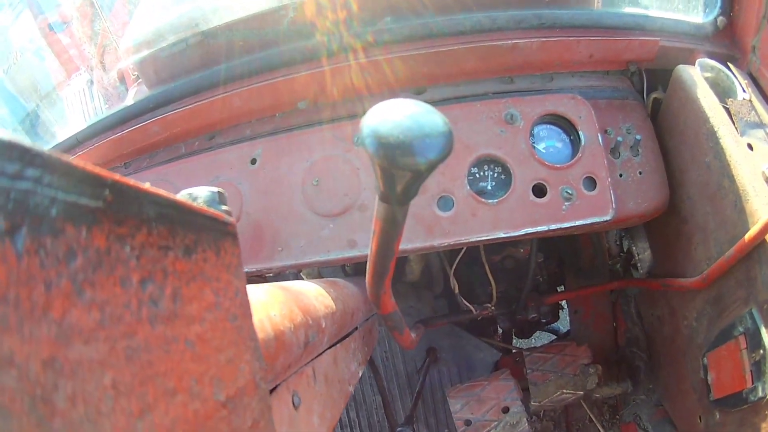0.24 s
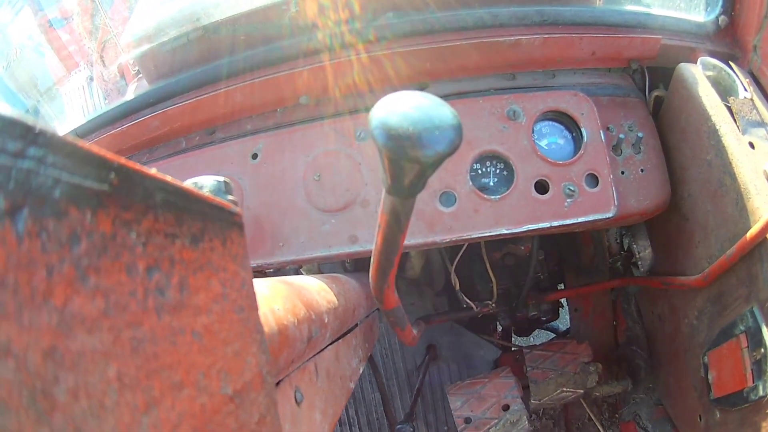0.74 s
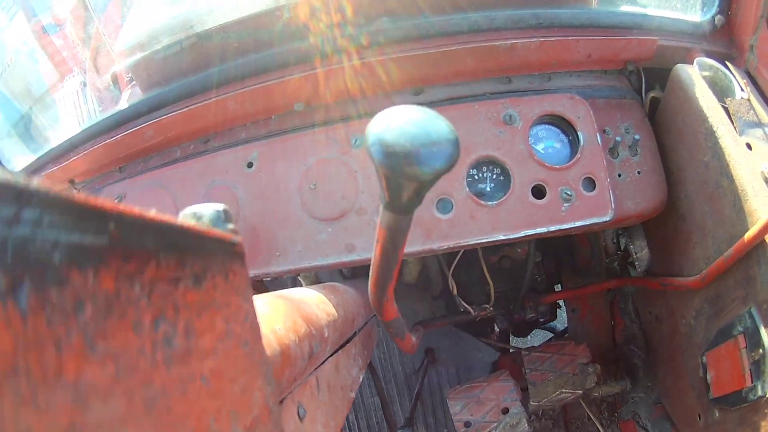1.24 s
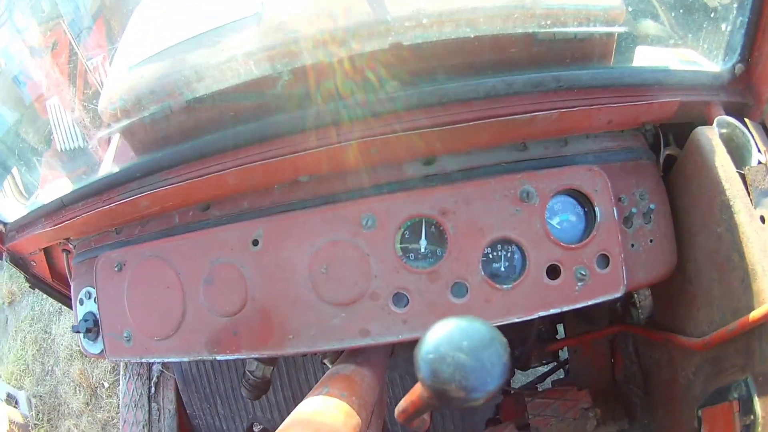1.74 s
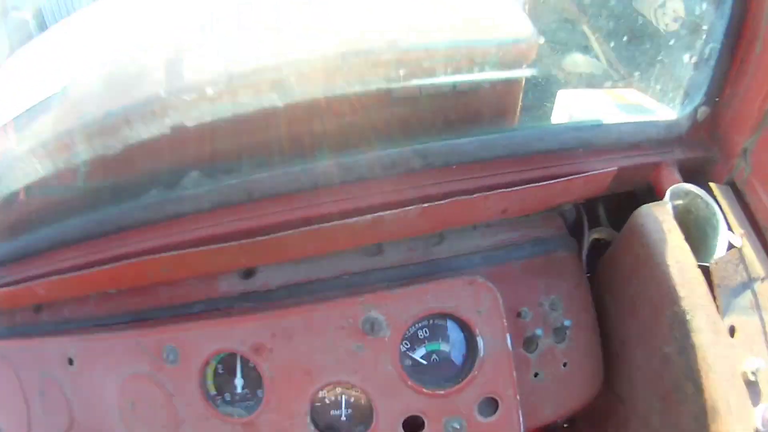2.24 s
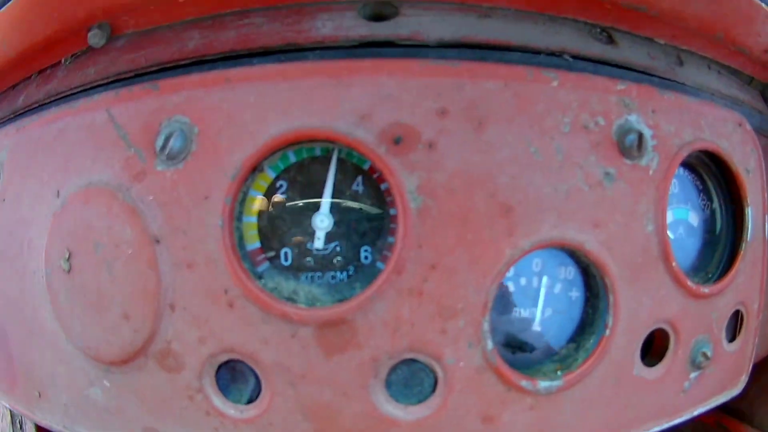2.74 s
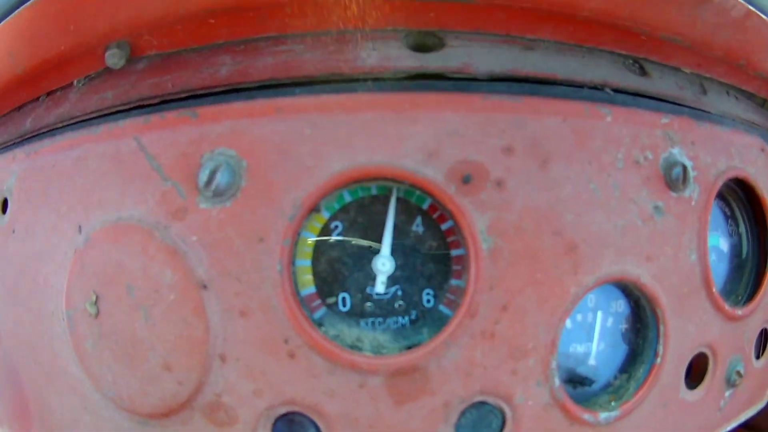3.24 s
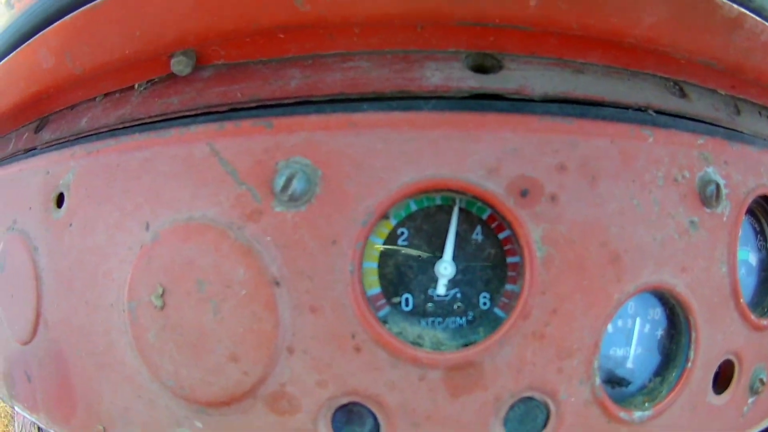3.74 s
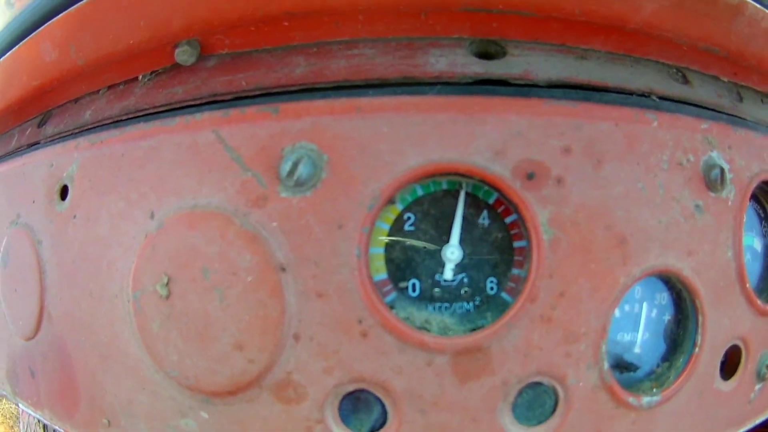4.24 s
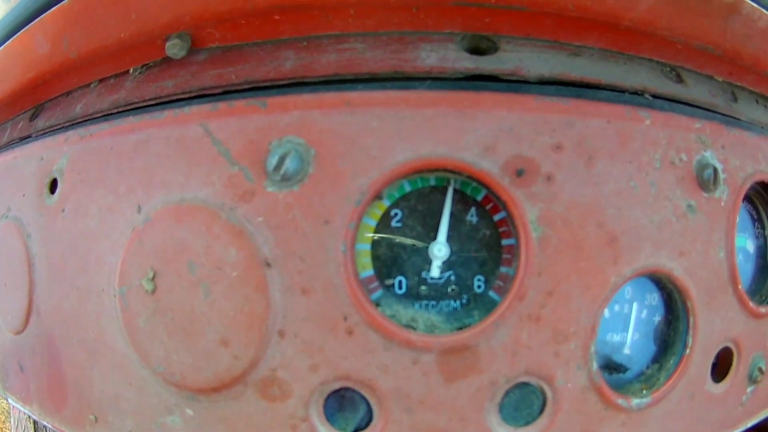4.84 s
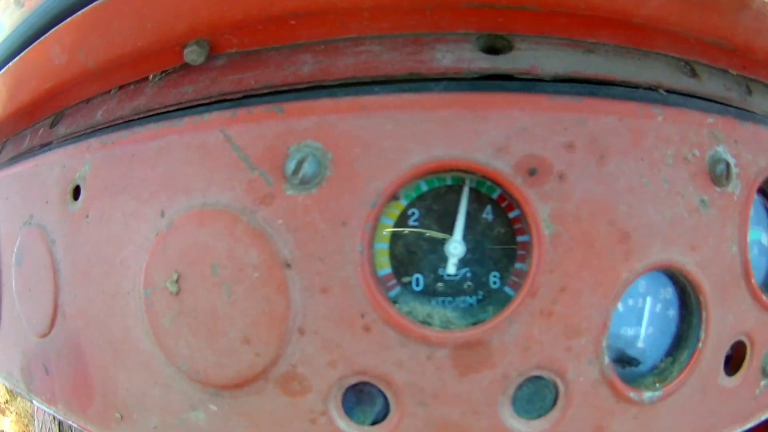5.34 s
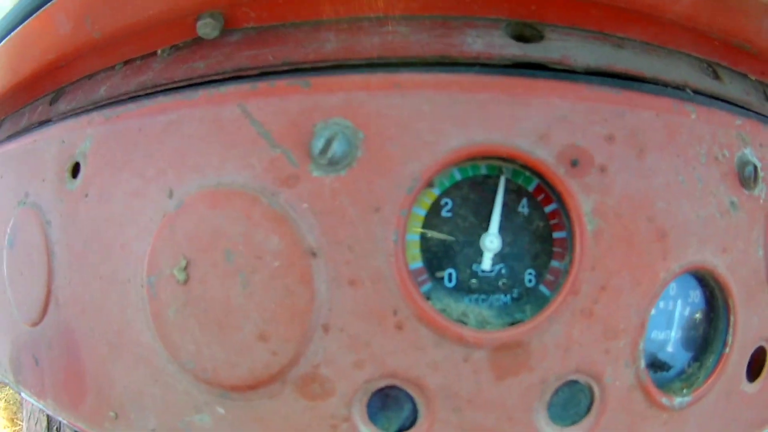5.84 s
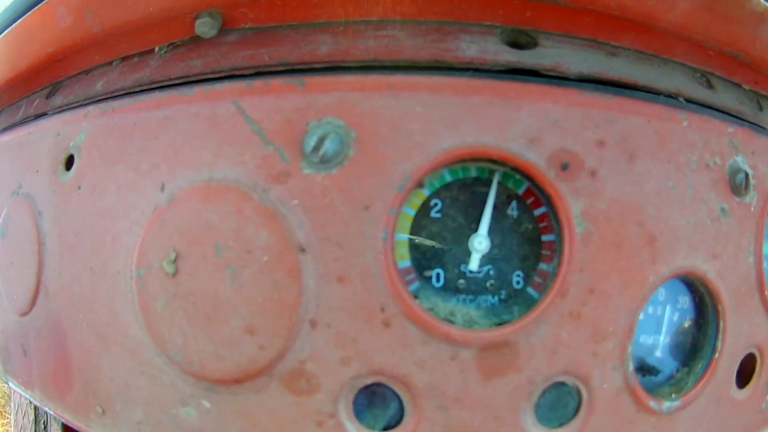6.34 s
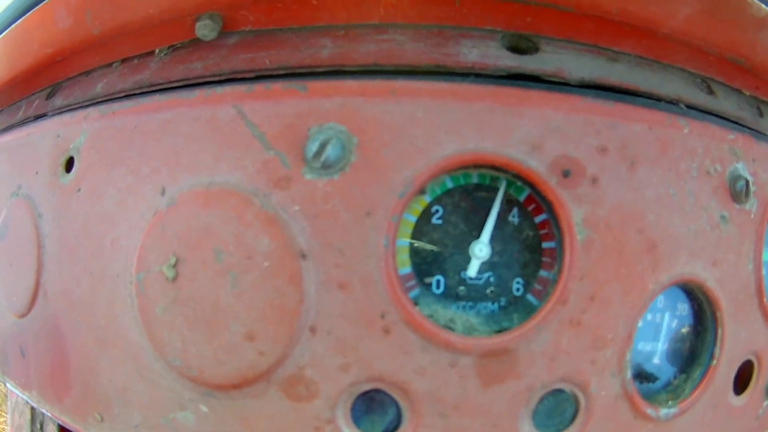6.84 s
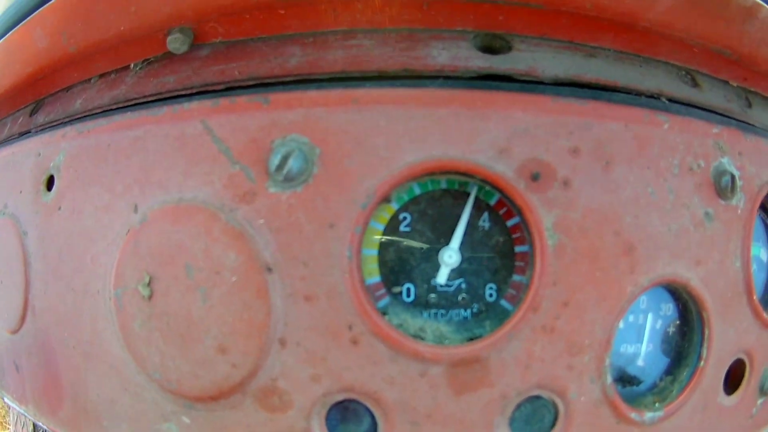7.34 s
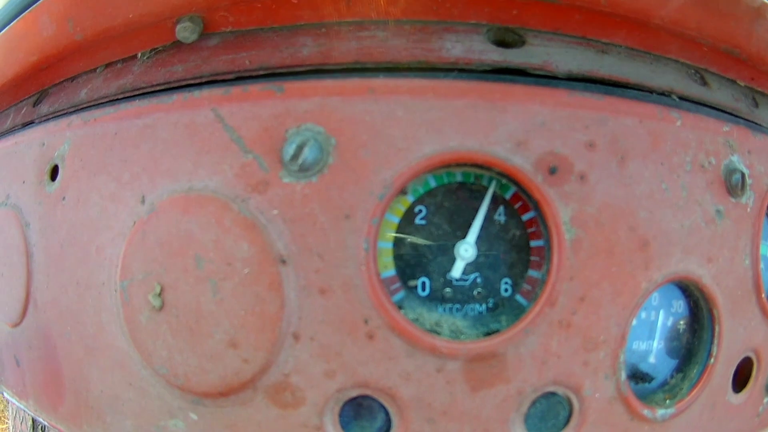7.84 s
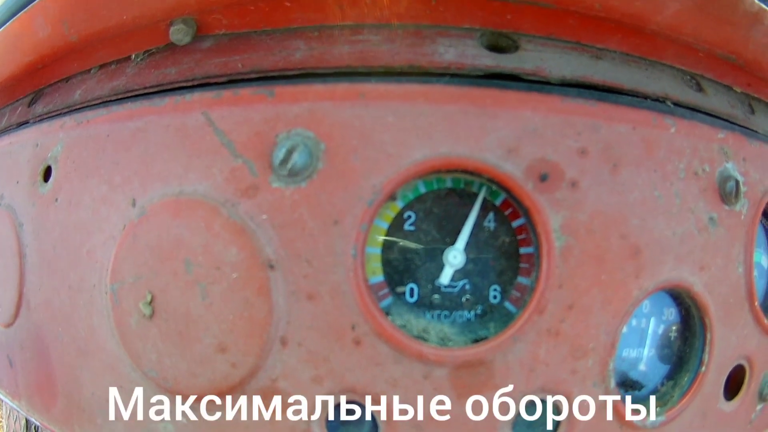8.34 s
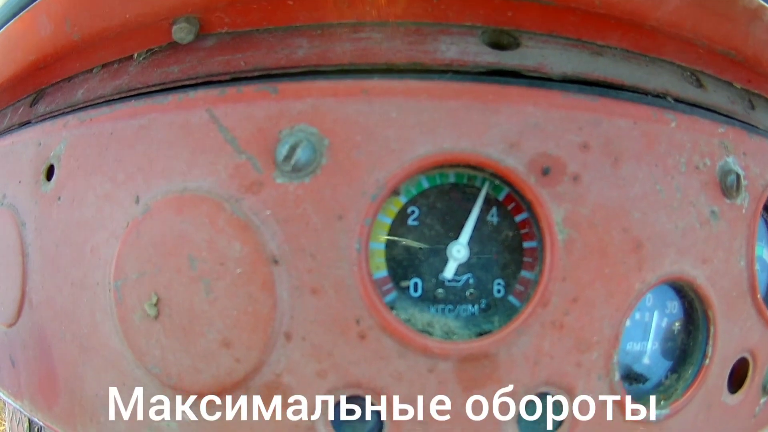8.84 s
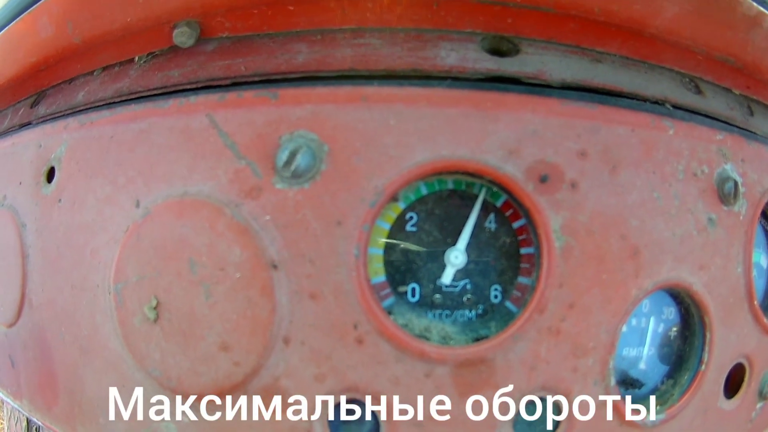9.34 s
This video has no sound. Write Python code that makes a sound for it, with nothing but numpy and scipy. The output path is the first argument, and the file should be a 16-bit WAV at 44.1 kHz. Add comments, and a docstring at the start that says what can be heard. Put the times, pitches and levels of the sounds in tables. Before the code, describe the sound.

From 0 to 5.5 s an old tractor diesel idles steadily inside its steel cab, lumpy and uneven, with one blunt hard knock per cycle, about eight a second, ringing the sheet metal. Under it the cab air booms low; over it sit combustion clatter and valve chatter. A thin wavering panel tone sings near the seat until, between 1.8 and 2.5 s, the microphone moves to the dashboard and the clatter comes slightly closer. At 5.6 s the throttle opens with a stumbling thump; speed climbs quickly to 7.6 s, harsher and brighter, while a loose metal part rattles from 5.8 to 6.9 s. The separate knocks blend into a dense roaring drone, held until 8.5 s, then rising again to the end at 9.6 s, with a swelling low rumble around 9 s. Short bright overload crackles appear from 6.7 s, more often after 8.5 s. It ends still revving.

```python
"""Inside the steel cab of an old diesel tractor. The engine idles lumpily, with one hard knock per cycle,
while the microphone moves from the seat up to the dashboard; then it is opened up in two steps to full speed.
Firings make the cab air boom, clicks of combustion and valve gear ring in its panels,
and struck modes make a loose part rattle as the speed passes through.
Filtered noise adds a low rumble at the microphone and short bright overload ticks."""
import sys
import numpy as np
from scipy import signal
from scipy.fft import rfft, irfft, next_fast_len
from scipy.io import wavfile
from scipy.ndimage import uniform_filter1d, minimum_filter1d

SR = 44100
rng = np.random.default_rng(int(sys.argv[2]) if len(sys.argv) > 2 else 0)


def dump(signal):
    """Clip the signal to [-1, 1] and save it as 16-bit WAV at the path in sys.argv[1]."""
    limited = np.clip(np.atleast_2d(signal).T, -1, 1)
    pcm = np.round(limited * 32767).astype(np.int16)
    wavfile.write(sys.argv[1], SR, pcm)


N = 422478
T = np.arange(N) / SR
SIZE = next_fast_len(N + SR // 2, real=True)
HZ = np.maximum(np.arange(SIZE // 2 + 1) * SR / SIZE, 1)


def from_db(db):
    """Decibels to gain."""
    return 10 ** (np.asarray(db) / 20)


def ramp(start, end):
    """A change from 0 to 1 between two moments in seconds."""
    return np.clip((T - start) / (end - start), 0, 1)


def cut(x, hz, kind, order=2):
    """Butterworth filter."""
    return signal.sosfilt(signal.butter(order, hz, kind, fs=SR, output="sos"), x)


def drift(rate):
    """Chance values of spread about 1, drawn at this rate per second and joined by straight lines."""
    points = rng.standard_normal(int(T[-1] * rate) + 2)
    return np.interp(T * rate, np.arange(len(points)), points)


def local_rms(x, floor):
    """Rms over 0.36 s, a few engine cycles."""
    return np.sqrt(uniform_filter1d(x * x, size=15900) + floor)


def steady(x):
    """Scale to rms 1 over a few engine cycles."""
    return x / local_rms(x, 1e-12)


def causal(level_db):
    """Minimum-phase response with these levels: a body rings only after it is struck."""
    cepstrum = irfft(np.log(from_db(level_db)))
    half = len(cepstrum) // 2
    cepstrum[1:half] *= 2
    cepstrum[half + 1:] = 0
    return np.exp(rfft(cepstrum))


def peaks(modes):
    """Level in dB that a set of resonances adds at each frequency."""
    return sum(peak_db / (1 + (2 * (HZ - centre) / width) ** 2) for centre, width, peak_db in modes)


def ring(clicks, modes, uneven_db):
    """Each click sets all modes ringing as decaying sines, with new strengths every time."""
    out, at = np.zeros(N), np.flatnonzero(clicks)
    for hz, level_db, t60 in modes:
        force = np.full(N, 1e-18)
        force[at] = clicks[at] * from_db(level_db + uneven_db * rng.standard_normal(len(at)))
        radius = from_db(-60 / (t60 * SR))
        angle = 2 * np.pi * hz / SR
        poles = [1, -2 * radius * np.cos(angle), radius * radius]
        out += signal.lfilter([0, np.sin(angle)], poles, force)
    return out


def scatter(x, echo, spread_s):
    """Quick reflections between bare walls, as four allpass echoes, smear each click without colouring it."""
    lags_s = spread_s * np.geomspace(1 / 4, 1, 4) * rng.uniform(.85, 1.16, 4)
    for lag in (lags_s * SR).astype(int) + 1:
        taps = np.r_[-echo, np.zeros(lag - 1), 1]
        x = signal.lfilter(taps, taps[::-1], x)
    return x


def contacts(turn, position, gain, jitter_s, uneven_db):
    """Clicks that come back at the same crank positions in every cycle, never quite alike."""
    due = np.arange(-1, int(turn[-1]) + 1)[:, None] + position
    when = np.interp(due, turn, T, left=-1, right=-1) + jitter_s * rng.standard_normal(due.shape)
    force = gain * from_db(uneven_db * rng.standard_normal(due.shape))
    inside = (when > 0) & (when < T[-1])
    return np.bincount((when[inside] * SR).astype(int), force[inside], N)


def clicks_at(rows):
    """Clicks at listed moments; each row: start in seconds, level in dB."""
    start_s, level_db = np.transpose(rows)
    return np.bincount((start_s * SR).astype(int), from_db(level_db), N)


BUZZ_RISE_S = .0012


def buzz(clicks, band_hz, decay_s):
    """Each click sets off a dense, dying chatter within one band, its swing held between two stops."""
    fall, rise = np.exp(-1 / (SR * np.array([decay_s, BUZZ_RISE_S])))
    envelope = signal.lfilter([1 - rise], np.poly([fall, rise]), clicks + 1e-18)
    swing = cut(rng.standard_normal(N), band_hz, "bandpass", order=3)
    chatter = cut(np.sign(swing), np.array(band_hz) * [.85, 1.15], "bandpass", order=3)
    return envelope * chatter / chatter.std()


# Engine speed. Each row: time in seconds, four-stroke cycles per second.
ENGINE_SPEED = [(0.0, 8.279), (0.57, 8.279), (1.27, 8.342), (1.97, 8.295), (5.48, 8.335), (5.68, 8.647),
                (5.9, 8.628), (6.35, 10.886), (7.05, 13.638), (7.45, 14.781), (7.65, 15.14), (8.53, 15.108),
                (9.25, 17.193), (9.58, 17.989)]
FIRST_KNOCK = .76           # cycles before crank angle zero
FULL_PULL = 4.36            # acceleration that brings nearly full fuel, cycles per s, per s
FUEL_SMOOTHING_S = 0.19


def engine_state():
    """Crank angle in cycles, speed, and how hard the engine pulls (0-1), which follows from its acceleration."""
    speed = np.interp(T, *np.transpose(ENGINE_SPEED))
    gathering = uniform_filter1d(np.gradient(speed) * SR, size=int(FUEL_SMOOTHING_S * SR) + 1)
    pull = np.tanh(np.maximum(gathering, 0) / FULL_PULL)
    return np.cumsum(speed) / SR - FIRST_KNOCK, speed, pull


# Loudness laws of five layers. Each row: level in dB idling by the seat, dB more at the dashboard,
# dB per doubling of speed, dB more at full pull.
BOOM_LOUDNESS = (-18.5, -0.04, 0.65, 1.64)
CLATTER_LOUDNESS = (-29, 3, 8.5, 4.5)
TREBLE_LOUDNESS = (-55, -1, 10, 8.5)
KNOCK_LOUDNESS = (-24, -1.5, -2, 8.5)
RUMBLE_LOUDNESS = (-47, 1, 7.5, 7.5)
IDLE_CYCLES_PER_S = 8.3
LOUDEST_AT = 16.2           # cycles per s, above which speed adds no more loudness


def loudness(law, near, speed, pull):
    """Level in dB of a layer, from the microphone's nearness to the dashboard, speed and fuel."""
    idle_db, near_db, octave_db, pull_db = law
    octaves = np.log2(np.minimum(speed, LOUDEST_AT) / IDLE_CYCLES_PER_S)
    return idle_db + near_db * near + octave_db * octaves + pull_db * pull


def low_rumble():
    """Low wind-like rumble at the microphone: noise between 13 and 54 Hz."""
    return steady(cut(cut(rng.standard_normal(N), 54, "low", order=3), 13, "high"))


PANEL_HZ, PANEL_DB = 582, -39.5     # pitch, and rms level about which it wavers


def singing_panel(near):
    """A panel by the seat sings a wavering sine at idle, lost as the microphone leaves the seat."""
    phase = 2 * np.pi * PANEL_HZ * T + 0.45 * drift(11)
    return np.sqrt(2) * np.sin(phase) * from_db(PANEL_DB + 2 * drift(13)) * (1 - near)


# Overload ticks, as of a recorder driven too hard at speed.
# Each row: start in seconds, level in dB before filtering.
OVERLOAD_TICKS = [(6.7165, -28), (6.735, -27), (7.0984, -31), (7.4521, -23), (8.5072, -35), (8.6998, -35),
                  (8.7118, -30), (8.8963, -29), (8.9572, -31), (9.0191, -27), (9.0794, -31), (9.1977, -29),
                  (9.2135, -30)]
TICK_HZ, TICK_DECAY_S = (1500, 5000), .0015


def overload_ticks():
    """Short, bright crackles at listed moments: dying bursts of noise that stick out of the clatter."""
    fall = np.exp(-1 / (TICK_DECAY_S * SR))
    envelope = signal.lfilter([1], [1, -fall], clicks_at(OVERLOAD_TICKS) + 1e-18)
    crackle = cut(envelope * rng.standard_normal(N), TICK_HZ, "bandpass")
    return cut(crackle, 12500, "low", order=8)


# Strikes of a loose metal part. Each row: start in seconds, strike level in dB before it rings.
LOOSE_STRIKES = [(5.7758, -20), (5.811, -18), (5.8297, -13.5), (5.861, -11), (5.8745, -19), (5.891, -15.5),
                 (5.975, -18.5), (6.043, -21), (6.0565, -21.5), (6.229, -20.5), (6.266, -24), (6.2775, -26),
                 (6.326, -19), (6.421, -14), (6.455, -17), (6.475, -14), (6.492, -20), (6.5107, -14),
                 (6.5265, -23), (6.5457, -14.5), (6.564, -13), (6.58, -13), (6.598, -13), (6.613, -17),
                 (6.633, -12.5), (6.6655, -15), (6.684, -19), (6.699, -17), (6.711, -21), (6.717, -14),
                 (6.736, -16), (6.751, -17), (6.782, -15.5), (6.793, -20), (6.832, -19), (6.861, -25)]
# Modes of the loose part. Each row: frequency in Hz, relative level in dB, t60 in seconds.
LOOSE_PART_MODES = [(1960, -11, 0.013), (2310, -6.5, 0.015), (2450, -2, 0.017), (2540, -8.5, .013),
                    (2830, -13.5, .012), (3530, -13, .008), (4050, -16, 0.0079), (4250, -14.5, .009),
                    (8650, -7.5, 0.005), (9000, -8, .004)]
BOUNCE_DECAY_S, BOUNCE_DB = .003, -2.5      # level against the strike


def rattle():
    """Each strike of the loose part is one firm click and a burst of tiny bounces, a few milliseconds long."""
    clicks = np.zeros(N)
    after = np.arange(400) / SR
    for start_s, level_db in LOOSE_STRIKES:
        bounces = rng.standard_normal(len(after)) * np.exp(-after / BOUNCE_DECAY_S)
        burst = (after == 0) + from_db(BOUNCE_DB) * bounces / np.linalg.norm(bounces)
        first = round(start_s * SR)
        clicks[first:first + len(after)] += from_db(level_db) * burst
    ringing = ring(clicks, LOOSE_PART_MODES, uneven_db=0.3)
    return from_db(-2.5) * cut(ringing, 3750, "low", order=3)


# The first gulp of fuel. Each row: start in seconds, relative level in dB.
FUEL_GULPS = [(5.594, -25), (5.622, -21), (5.642, -19)]


def gulp():
    """A broad, stumbling thump of the cab as the first extra fuel burns."""
    return buzz(clicks_at(FUEL_GULPS), (220, 1300), decay_s=0.013)


# Injectors, valve gear and loose sheet metal. Each row: position in the cycle 0-1, centre in Hz, width in Hz,
# decay in seconds, then relative level in dB by the seat, at the dashboard, pulling, running free.
CRANK_BUZZES = [(0.97, 3970, 400, .013, -49, -46, -49, -50.5), (0.86, 3970, 330, .008, -58, -54, -57, -50),
                (.76, 4000, 700, .0025, -53, -42, -54, -49), (.78, 2600, 1200, .003, -49, -41, -37, -37),
                (.17, 6350, 1100, 0.014, -59.5, -59, -56, -57.5),
                (.99, 6000, 1400, .012, -63, -59.5, -55, -57.5),
                (0.43, 2700, 1000, 0.016, -43.5, -44, -41, -41.5),
                (0.97, 1950, 1100, 0.006, -48, -43, -22, -41.5),
                (.76, 1150, 650, 0.0035, -29, -23.5, -19, -24),
                (0.99, 850, 230, 0.007, -28, -26, -23, -26.5), (0.03, 930, 130, .016, -32, -26, -25, -26),
                (.15, 1230, 260, .011, -36.5, -33, -16.5, -22), (.0, 1230, 330, 0.008, -42, -32, -16, -16),
                (.29, 400, 212, .013, -32, -27, -21.5, -20), (.5, 1250, 200, .012, -38, -30, -32, -32),
                (.55, 4900, 2400, .012, -62, -64, -45, -51), (.99, 10300, 2600, .025, -73, -78, -71, -77)]
# Firings thud in the floor and bulkhead. Each row: position in the cycle 0-1, frequency in Hz,
# t60 in seconds, then level in dB before filtering by the seat, at the dashboard, pulling, running free.
FLOOR_THUDS = [(0.99, 275, .06, -23.5, -29, -16, -24), (.18, 235, 0.068, -26, -22.5, -22, -23.5),
               (.41, 165, 0.057, -20.5, -17.5, -22.5, -24), (0.01, 165, 0.044, -29, -33, -11.5, -20.5)]


def fittings(turn, states):
    """Buzzes and thuds come round with the crank; their strength follows the listening place and engine state."""
    out = 0
    for at, hz, width_hz, decay_s, *level_db in CRANK_BUZZES:
        strikes = contacts(turn, np.array([at]), 0.94, jitter_s=0.00055, uneven_db=1)
        strikes = strikes * (from_db(level_db) @ states)
        band_hz = [max(hz - width_hz / 2, 50), hz + width_hz / 2]
        out = out + buzz(strikes, band_hz, decay_s)
    for at, hz, t60, *level_db in FLOOR_THUDS:
        strikes = contacts(turn, np.array([at]), 1, jitter_s=.0005, uneven_db=2.0)
        strikes = strikes * (from_db(level_db) @ states)
        out = out + cut(ring(strikes, [(hz, 0, t60)], uneven_db=1.5), [130, 500], "bandpass")
    return out


# Lesser contacts in each cycle. Each row: position in the cycle 0-1, relative dB idling, running fast.
LESSER_KNOCKS = [(.02, -3, -1.5), (.08, -4.5, -6), (0.249, -3, -17.5), (.50, 1, -7), (0.699, -18, 0),
                 (0.789, 0, -10), (0.879, -2, -4)]
# Swell of the clatter over a cycle. Each row: position in the cycle 0-1, dB idling, under load.
CYCLE_SWELL = [(.0, 1.3, 2.5), (.18, 1.6, 2), (.36, .3, 1.2), (.5, -1, -1), (.66, -1.9, -2.5),
               (.8, -.7, -1.5), (.94, -1.5, -3.5)]
COASTING_SWELL = 0.35               # share of the swell left when running fast without pulling
GRIT_DB, GRIT_PER_S = 1.8, 450      # roughness of the rush of gas under load, and the rate of its grain


def clatter(turn, load, pull):
    """Combustion, many small valve and gear contacts, and a rush of gas that comes in gusts under load."""
    position, idle_db, load_db = np.transpose(CYCLE_SWELL)
    idle_swell_db = np.interp(turn, position, idle_db, period=1)
    load_swell_db = np.interp(turn, position, load_db, period=1)
    swell = from_db((1 - load) * idle_swell_db + load * load_swell_db)
    swell = swell ** (1 - (1 - COASTING_SWELL) * load * (1 - pull))
    knocks = 0
    for at, idle, fast in LESSER_KNOCKS:
        clicks = contacts(turn, np.array([at]), 1, jitter_s=.0002, uneven_db=0.8)
        knocks = knocks + clicks * from_db(idle + load * (fast - idle))
    knocks = steady(scatter(cut(knocks, 1600, "low"), echo=0.5, spread_s=.0045))
    small = contacts(turn, rng.random(320), rng.choice([-1, 1], 320), jitter_s=.00007, uneven_db=2.5)
    grit = from_db(load * (GRIT_DB * drift(GRIT_PER_S) - .5))
    rush = rng.standard_normal(N) * swell ** load * grit
    return swell * steady(small) + from_db(-4.0) * rush + from_db(-13.5 - 1.6 * load) * knocks


# Colour of the clatter from the seat, at the dashboard and at speed. Each row: Hz, relative dB per Hz.
SEAT_COLOUR = [(100, -16), (170, -5.5), (260, -6), (450, -11.5), (750, -15.5), (1300, -11.5), (1600, -19.5),
               (2400, -34), (3200, -47), (4200, -48), (6000, -51.5), (7200, -61.5), (10000, -76),
               (15000, -73)]
DASH_COLOUR = [(100, 11.5), (170, -13), (260, -9.5), (450, -20.5), (750, -28.5), (1300, -28.5),
               (1600, -27.5), (2400, -40), (3200, -51), (4200, -51.5), (6000, -58), (7200, -68),
               (10000, -78.5), (15000, -80)]
FAST_COLOUR = [(100, 4.5), (170, -23.5), (260, -24.5), (450, -19.5), (750, -35), (1300, -32), (1600, -42),
               (2400, -49.5), (3200, -62), (4200, -62), (6000, -67.5), (7200, -76), (10000, -88.5),
               (12300, -89), (13500, -97.5)]
# Panel and air resonances that stand out in each case. Each row: centre in Hz, width in Hz, peak in dB.
SEAT_RESONANCES = [(245, 55, 7.5), (498, 18, 4.5), (587.5, 32, 9.5), (708, 73, 6), (808, 30, 5.5),
                   (936, 130, 6.5), (1900, 80, 5.5), (2430, 23, 6.5), (2900, 570, 6), (4000, 620, 9.5)]
DASH_RESONANCES = [(319, 68, 3.7), (409.8, 20.3, 10), (512, 110, 3.2), (690, 120, 9.5), (837, 79, 5.4),
                   (942, 110, 7), (1080, 52, 5.8), (1227, 158, 12.4), (2960, 480, 5), (3950, 270, 8)]
FAST_RESONANCES = [(207, 18, 7.9), (277.6, 21, 7), (660, 70, 7.5), (808, 140, 8.5), (942, 57, 6.8),
                   (1072, 150, 6.6), (1264, 230, 5.9), (1840, 560, 5), (2830, 240, 4), (3870, 660, 5.3)]


def cab(drive, colour, modes):
    """A drive heard through the cab's resonances, scaled by their power between 220 and 1800 Hz."""
    hz, db = np.transpose(colour)
    level_db = np.interp(np.log(HZ), np.log(hz), db) + peaks(modes)
    mids = (HZ > 220) & (HZ < 1800)
    midrange = np.sqrt(np.mean(from_db(level_db) ** 2 * mids))
    return irfft(drive * causal(level_db), SIZE)[:N] / midrange


def clatter_in_cab(turn, near, load, pull, clatter_db, treble_db):
    """The panels colour the clatter by place and speed; harder combustion brightens it."""
    drive = rfft(cut(steady(clatter(turn, load, pull)), 171.7, "high", order=4), SIZE)
    seat = cab(drive, SEAT_COLOUR, SEAT_RESONANCES)
    dash = cab(drive, DASH_COLOUR, DASH_RESONANCES)
    idling = (1 - near) * seat + near * dash
    panels = (1 - load) * idling + load * cab(drive, FAST_COLOUR, FAST_RESONANCES)
    body = cut(panels, 3000, "low", order=4) * from_db(clatter_db)
    treble_rms = local_rms(cut(panels, 3300, "high", order=8), 1e-14)
    top = cut(panels, 2880, "high", order=4) / treble_rms * from_db(treble_db)
    return body + top


# Sheet metal rung by the one hard knock of each cycle. Each row: frequency in Hz,
# relative dB from the seat, relative dB at the dashboard, t60 in seconds.
SHEET_METAL_MODES = [(374, -17.5, -8, 0.063), (527, 1, -11.5, 0.079), (579, -2, -14, 0.062),
                     (907, -7, -3, 0.09), (941, 2, -3.5, 0.064)]
KNOCK_AT = .992             # place in the cycle, 0-1


def hard_knock(turn, near, level_db):
    """One cylinder knocks once a cycle, a blunt blow that rings the sheet metal."""
    blows = contacts(turn, np.array([KNOCK_AT]), 1, jitter_s=.0003, uneven_db=.4) * from_db(level_db)
    modes = np.array(SHEET_METAL_MODES)
    seat = ring(blows, modes[:, [0, 1, 3]], uneven_db=.5)
    dash = ring(blows, modes[:, [0, 2, 3]], uneven_db=.5)
    ringing = cut((1 - near) * seat + near * dash, 1100, "low", order=4)
    return scatter(ringing, echo=0.2, spread_s=0.000765)


CRACK_HZ, CRACK_DELAY_S = (430, 1050), .0015        # delay at idle speed
CRACK_SEAT_DB, CRACK_DASH_DB = -16, -24             # highest peak


def crack(turn, near, load):
    """The blunt front of the idle knock, nearly alike in every cycle; it is lost once the throttle opens."""
    late = turn - CRACK_DELAY_S * IDLE_CYCLES_PER_S
    blows = contacts(late, np.array([KNOCK_AT]), 1, jitter_s=.0002, uneven_db=.5)
    cracks = cut(blows, CRACK_HZ, "bandpass", order=4)
    peak_db = CRACK_SEAT_DB + near * (CRACK_DASH_DB - CRACK_SEAT_DB)
    return cracks / np.abs(cracks).max() * (1 - load) * from_db(peak_db)


# Orders of the cab boom. Each row: multiple of the cycle rate, relative dB idling, pulling, running free.
BOOM_ORDERS = [(2, -44, -3.5, 1), (3, -4.5, 6.5, 1), (4, 4, 6, 5.5), (5, 3.5, 0, 0), (6, -9.5, -15, -3.5),
               (7, 4, -4, -4), (8, -7, -2, -1), (9, -5.5, -5, -4), (10, -15.5, -12, -10),
               (11, -12, -10, -9), (12, -5, -4.5, -6), (13, -26, -8, -16), (14, -16.5, -7, -4.5),
               (15, -17.5, -11, -7), (16, -20.5, -12.5, -16), (17, -36, -14, -20), (18, -25, -21.5, -21),
               (19, -21.5, -18, -17), (20, -21, -16, -12), (22, -45, -23, -1), (25, -45, -24, -5),
               (28, -45, -16, -1), (29, -45, -16, -1)]
# Where in the cycle the pressure wave sets in (0-1): idling, pulling, running free.
BOOM_ONSETS = (.05, -.005, .005)
# Standing waves of the cab air, and a null between the lowest two.
# Each row: centre in Hz, width in Hz, peak in dB.
CAB_AIR_MODES = [(76.7, 33, 13.5), (99, 18, -6), (140.9, 45, 17.5), (217.4, 21, 17), (285, 31, 12.5)]
FIRING_STRAY = 0.0011               # spread under load, share of a cycle
GAS_DB, GAS_RISE_DB = -21.5, 6.5    # gas noise before the standing waves: idling, and more above idle
SPIN_UP_S = (5.9, 7.0)              # from, to: running free takes hold and the fittings shake harder


def boom(turn, load, pull):
    """Unequal firings make one lopsided pressure wave per cycle; its orders sweep through standing waves."""
    multiples, *states = np.transpose(BOOM_ORDERS)
    multiples = multiples.astype(int)
    straying = turn + FIRING_STRAY * load * drift(45)
    free = load * (1 - pull) * ramp(*SPIN_UP_S) ** 2
    push = 0
    for order_db, at, share in zip(states, BOOM_ONSETS, [1 - load, load - free, free]):
        level_db = np.full(257, -45.)
        level_db[multiples] = order_db
        wave = irfft(causal(level_db) * np.isin(np.arange(len(level_db)), multiples))
        cycle = np.arange(len(wave)) / len(wave)
        push = push + share * np.interp(straying - at, cycle, wave / wave.std(), period=1)
    # turbulent gas flow stirs the same standing waves
    gas = steady(cut(cut(rng.standard_normal(N), 300, "low", order=4), 42, "high"))
    push = cut(push, 1500, "low") + gas * from_db(GAS_DB + GAS_RISE_DB * load)
    return steady(irfft(rfft(push, SIZE) * causal(peaks(CAB_AIR_MODES)), SIZE)[:N])


MIC_MOVE_S = (1.82, 2.51)           # from, to: seat to dashboard
OPEN_UP_S = (5.65, 6.0)             # from, to: the throttle leaves idle
RUMBLE_AT, RUMBLE_WIDTH = 16.63, 1                  # engine speed of the strongest rumble, cycles per s
RUMBLE_BOOM_DB, RUMBLE_RISE_DB = 5, 13              # rise of the boom and of the rumble at that speed
KNOCK_SOFTENS_DB, BOOM_FILLS_DB = 9, 3.5            # change of hard knock and boom above idle


def scene():
    """One crank angle drives the boom, the clatter and the knocks; speed and fuel set their loudness."""
    turn, speed, pull = engine_state()
    near, load = ramp(*MIC_MOVE_S), ramp(*OPEN_UP_S)
    at_rumble_speed = np.exp(-((speed - RUMBLE_AT) / RUMBLE_WIDTH) ** 2)
    laws = (BOOM_LOUDNESS, CLATTER_LOUDNESS, TREBLE_LOUDNESS, KNOCK_LOUDNESS, RUMBLE_LOUDNESS)
    levels_db = [loudness(law, near, speed, pull) for law in laws]
    boom_db, clatter_db, treble_db, knock_db, rumble_db = levels_db
    # shares of: idling by the seat, idling at the dashboard, pulling, running free
    states = np.array([(1 - load) * (1 - near), (1 - load) * near,
                       load * pull, load * (1 - pull) * ramp(*SPIN_UP_S)])
    rumbling = from_db(rumble_db + RUMBLE_RISE_DB * at_rumble_speed) * low_rumble()
    details = singing_panel(near) + overload_ticks() + rattle() + gulp() + fittings(turn, states)
    clattering = clatter_in_cab(turn, near, load, pull, clatter_db, treble_db)
    knocking = hard_knock(turn, near, knock_db - KNOCK_SOFTENS_DB * load) + crack(turn, near, load)
    boom_db = boom_db + BOOM_FILLS_DB * load + RUMBLE_BOOM_DB * at_rumble_speed
    booming = from_db(boom_db) * boom(turn, load, pull)
    return (rumbling + details + clattering + knocking + booming)[None]


CUTOFF_HZ = 16400


def record(dry):
    """The microphone has a notch near 8 kHz; a fast limiter holds the highest peaks; the top is cut."""
    hollow = cut(dry, [7300, 8550], "bandstop")
    # the gain eases over 177 samples, 4 ms
    allowed = minimum_filter1d(.95 / np.maximum(np.abs(hollow), .95), size=177)
    limited = hollow * uniform_filter1d(allowed, size=177)
    return signal.sosfilt(signal.cheby2(12, 60, CUTOFF_HZ, fs=SR, output="sos"), limited)


dry = scene()
out = record(dry)
dump(out)
```